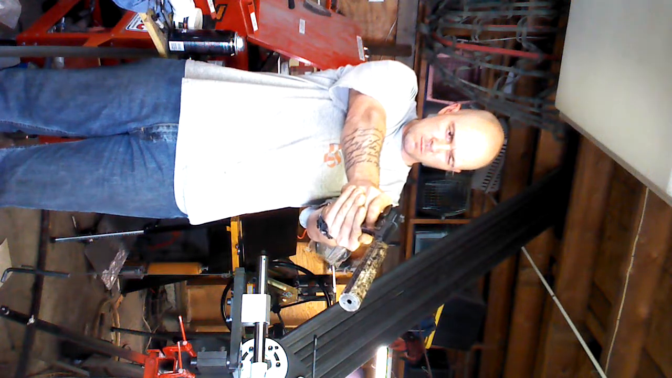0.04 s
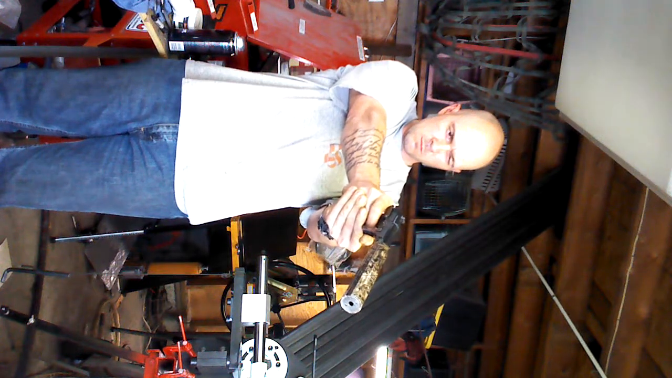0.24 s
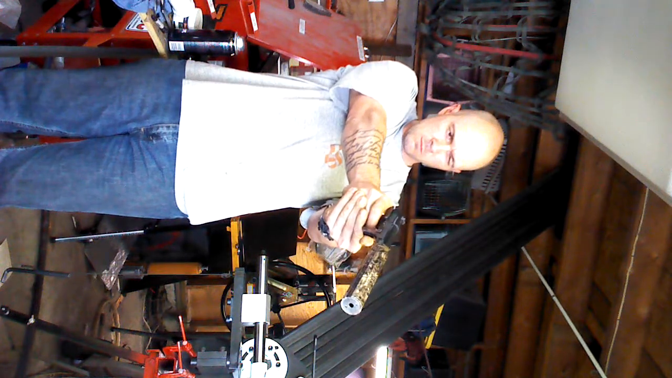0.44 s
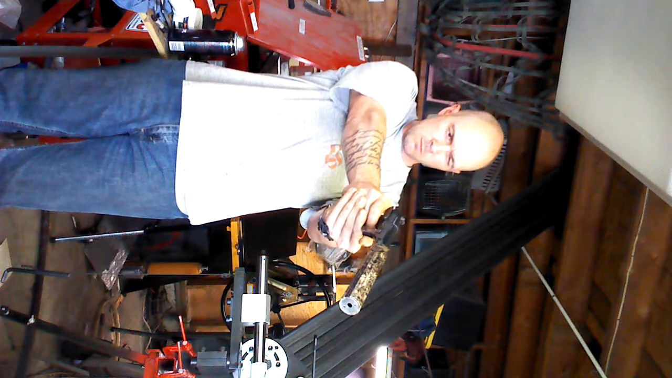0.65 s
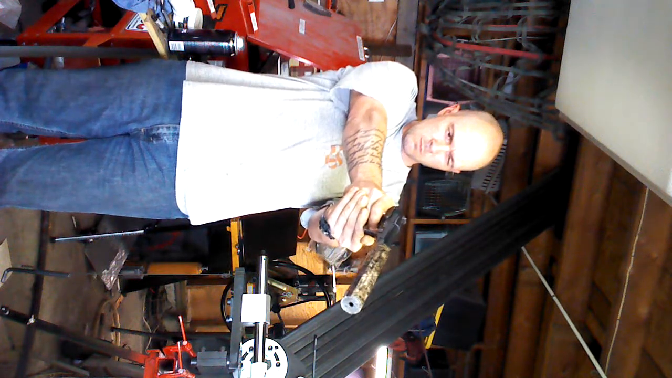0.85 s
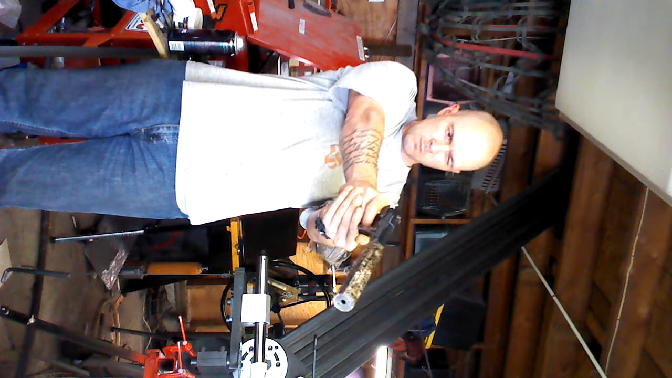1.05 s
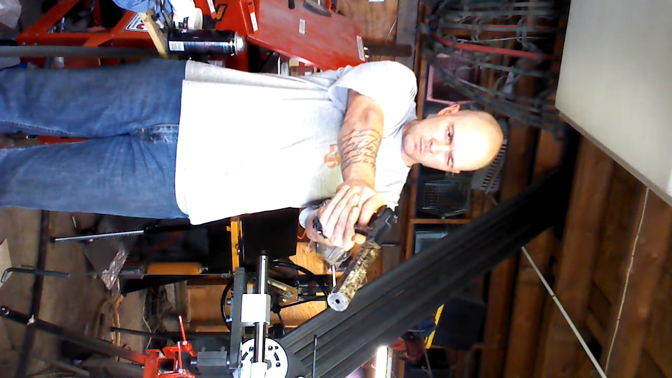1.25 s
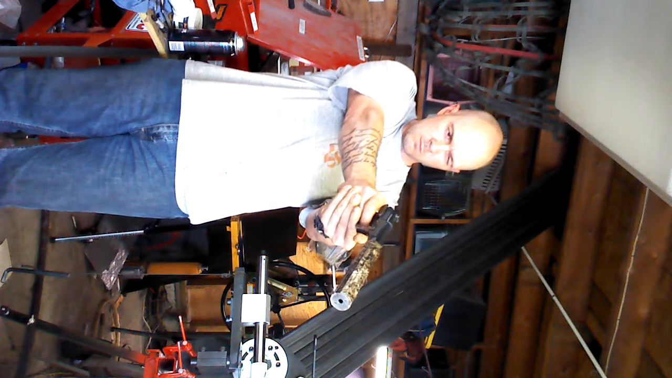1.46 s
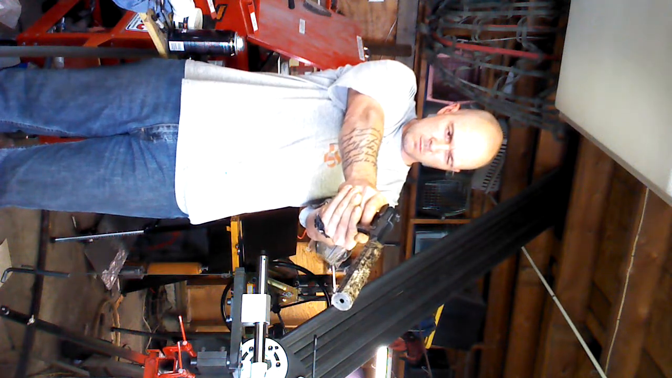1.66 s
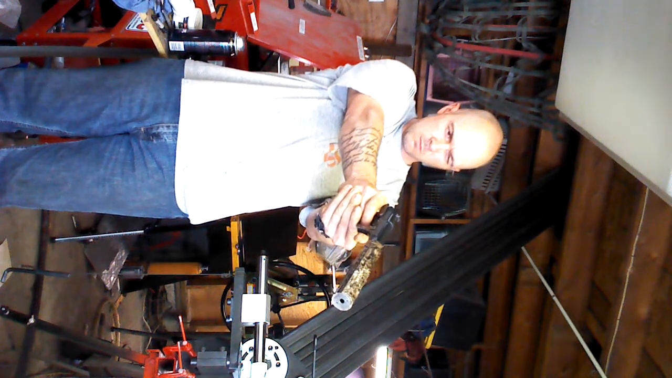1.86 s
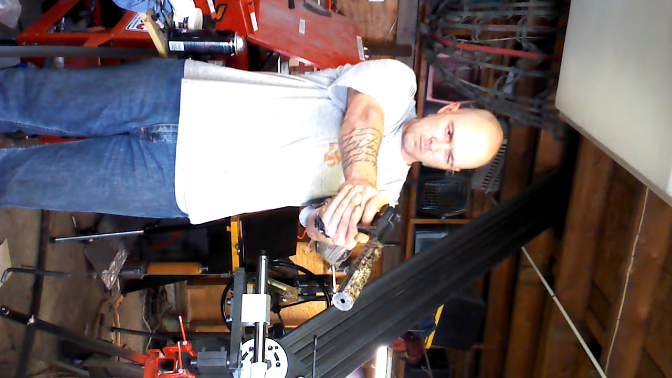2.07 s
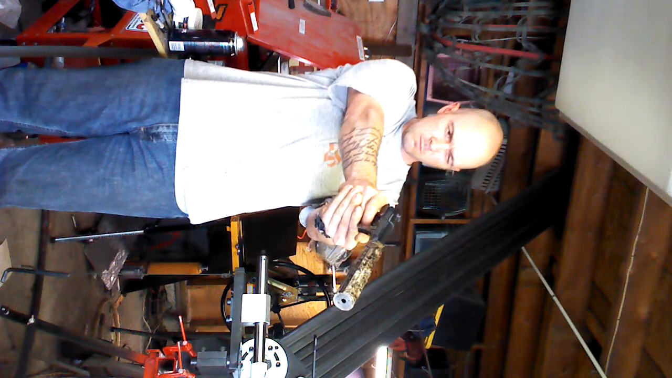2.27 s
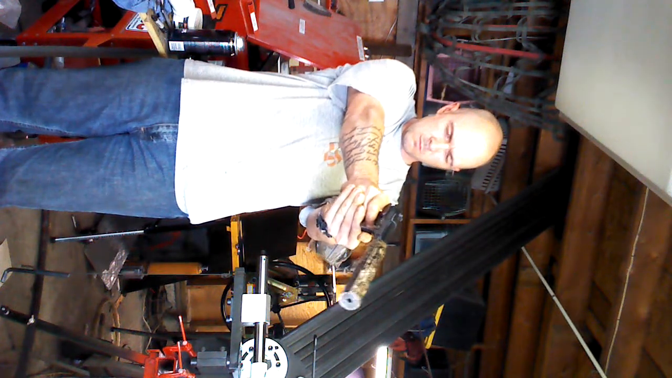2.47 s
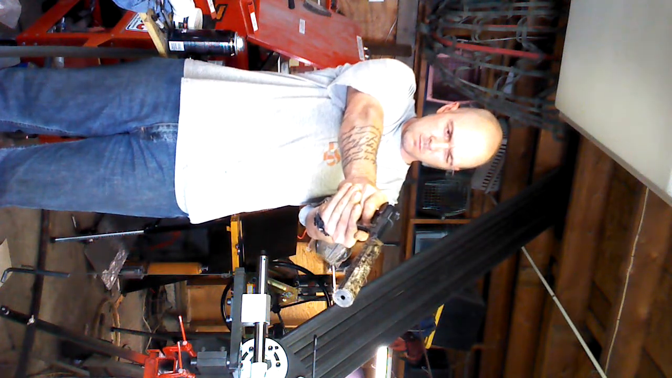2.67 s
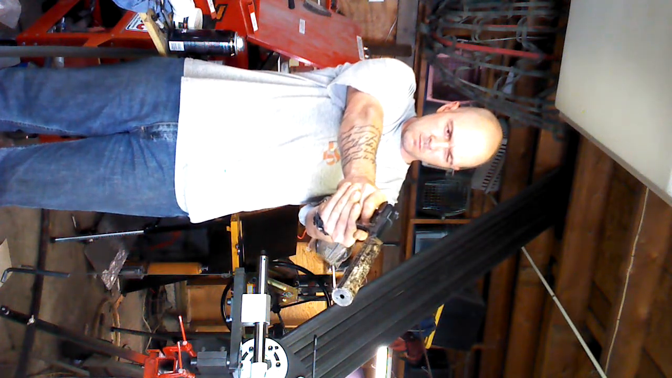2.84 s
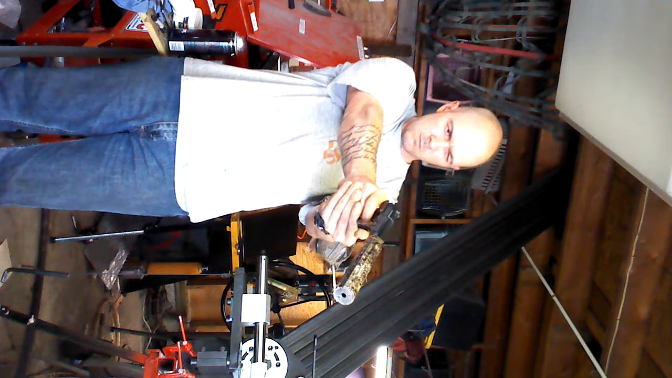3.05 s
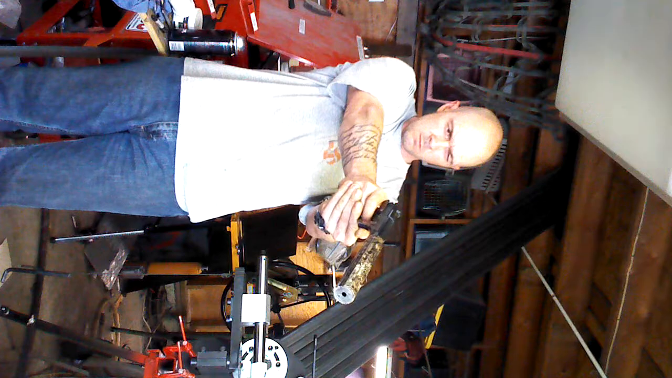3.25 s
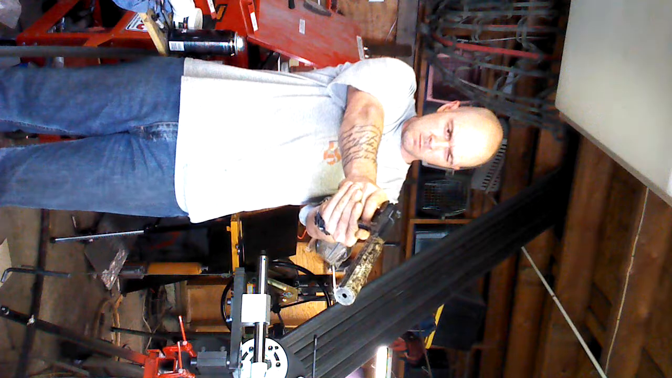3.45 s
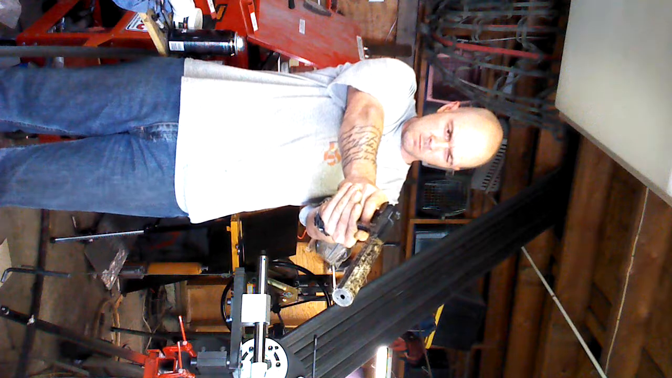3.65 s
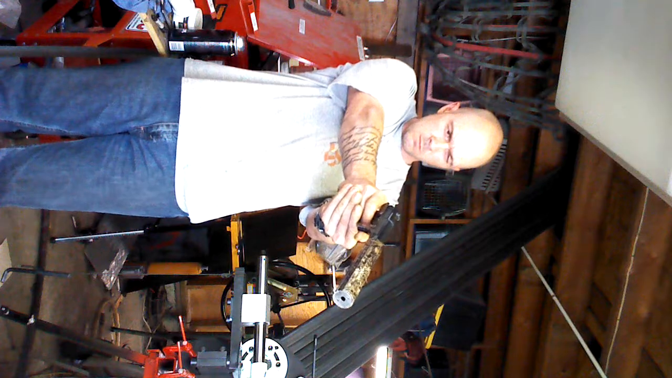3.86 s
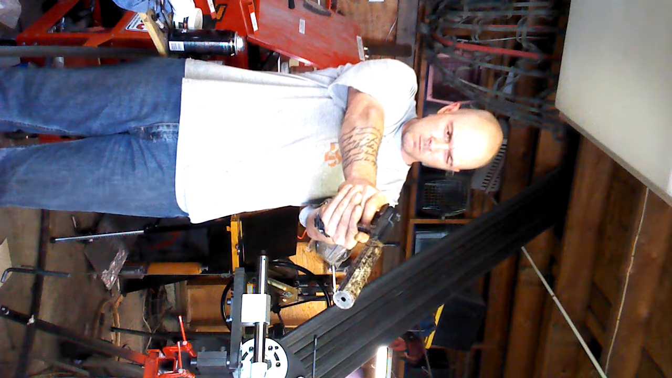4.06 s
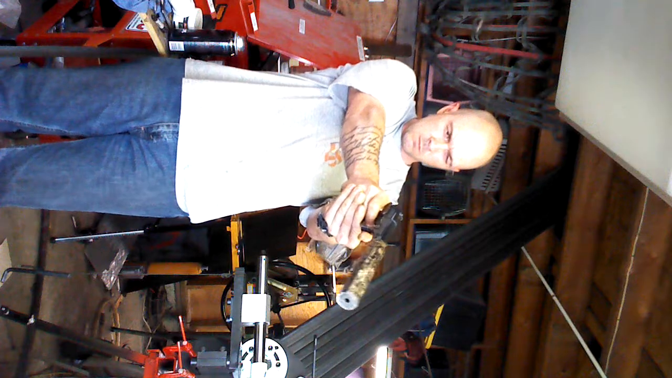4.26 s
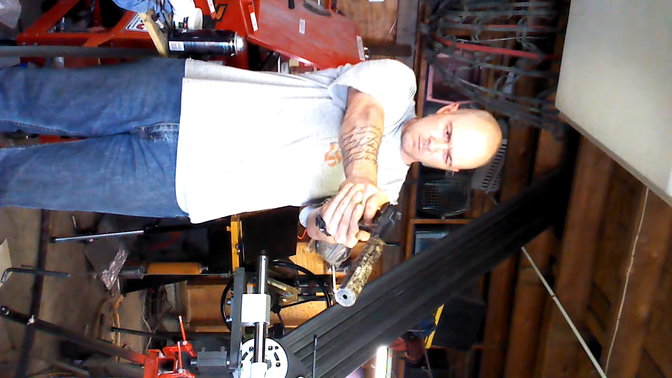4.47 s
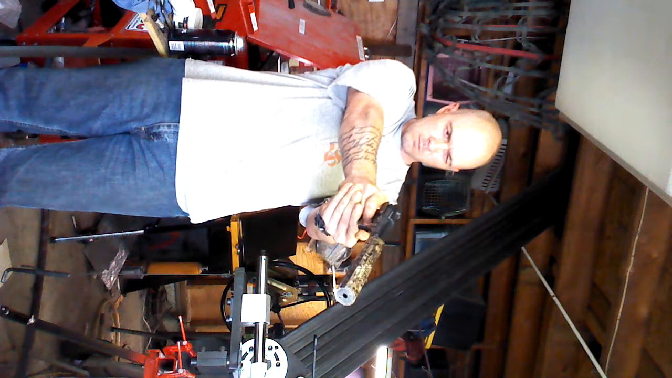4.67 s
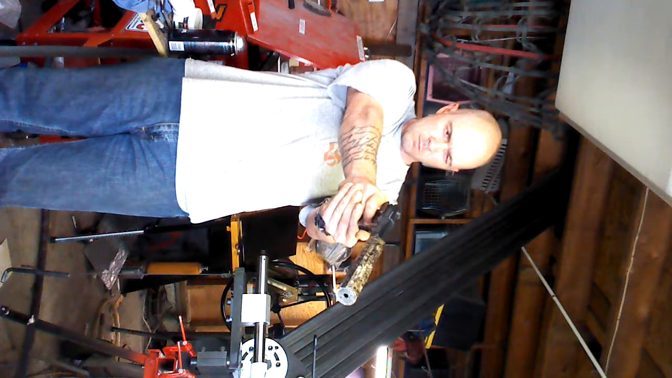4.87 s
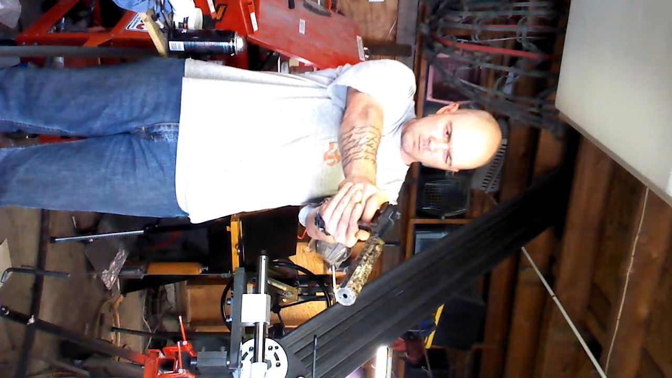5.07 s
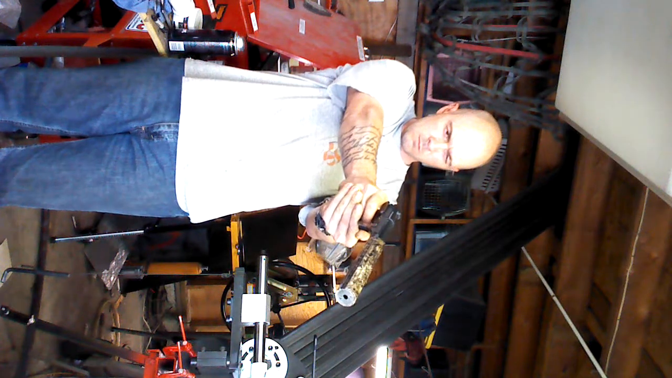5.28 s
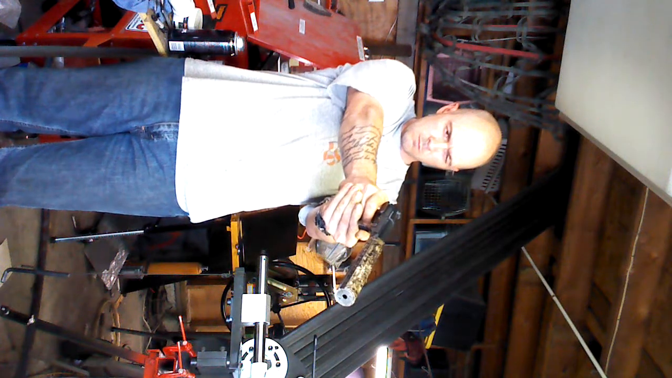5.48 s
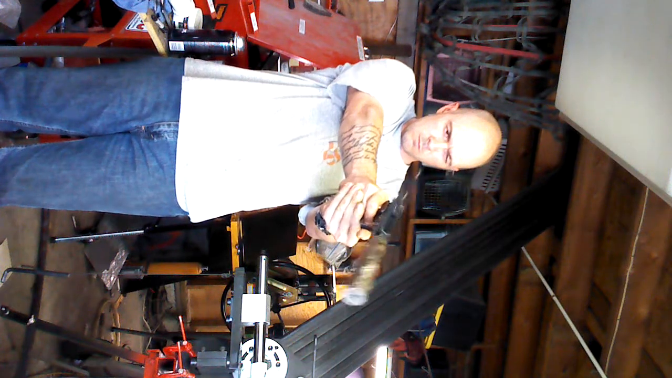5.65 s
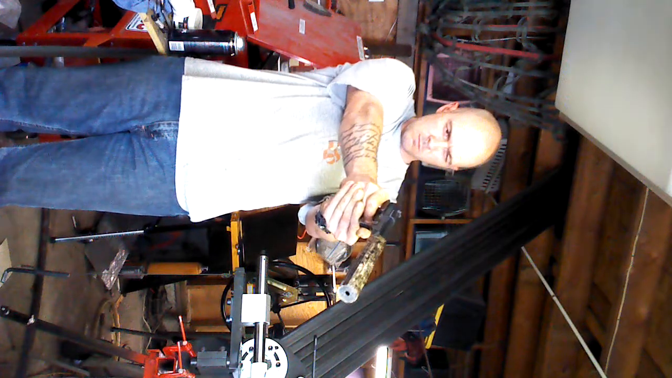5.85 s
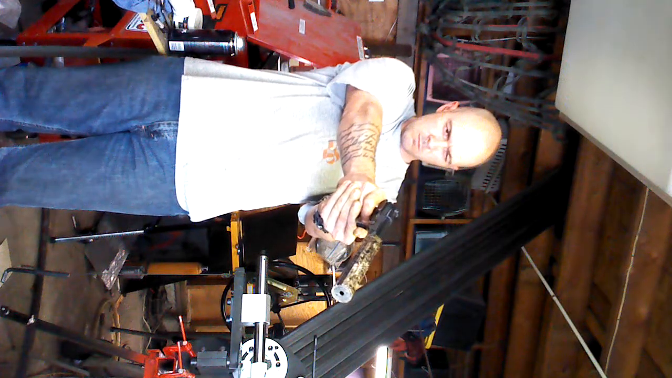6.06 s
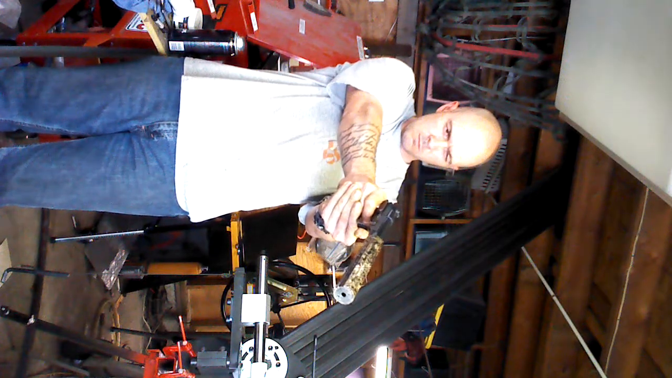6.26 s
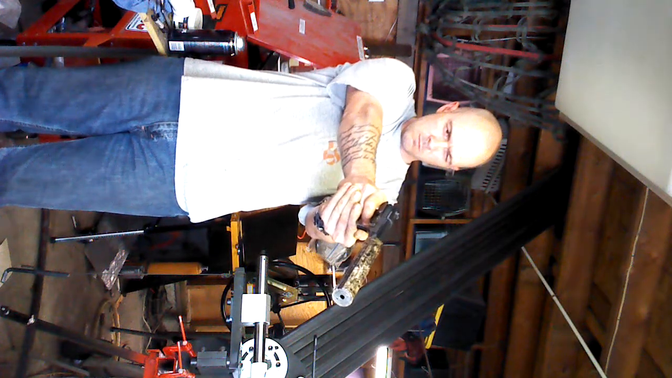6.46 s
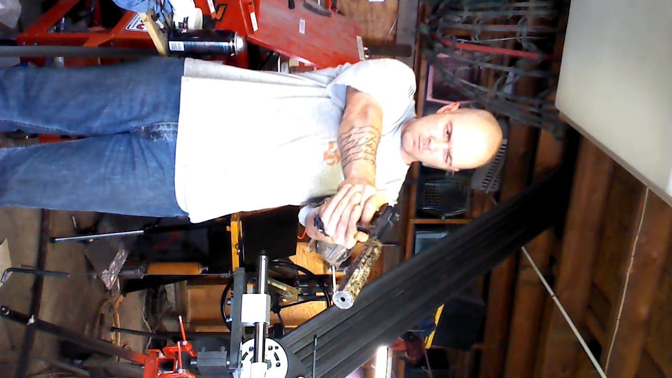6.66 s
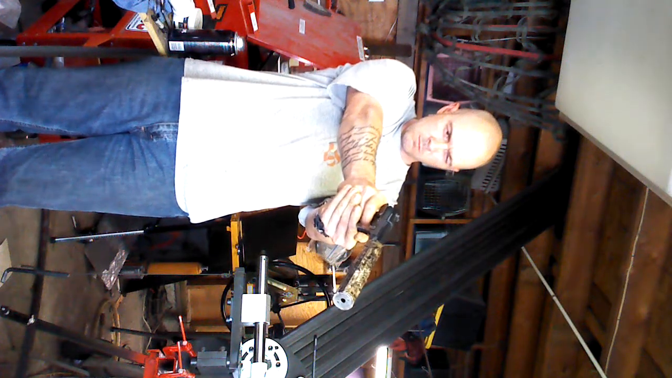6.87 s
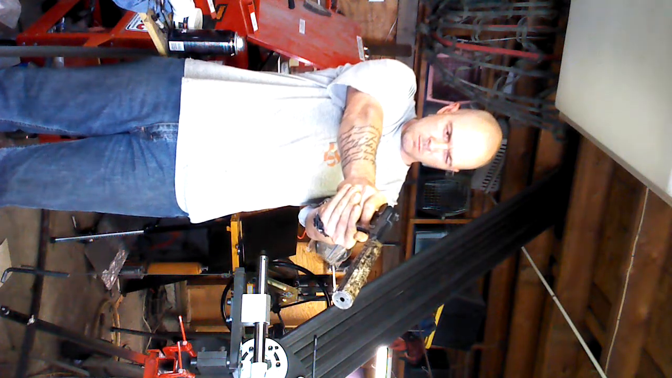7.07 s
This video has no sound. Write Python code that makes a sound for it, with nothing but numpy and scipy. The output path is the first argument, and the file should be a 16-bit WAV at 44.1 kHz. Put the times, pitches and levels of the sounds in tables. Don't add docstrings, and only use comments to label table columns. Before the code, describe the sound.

A heater fan hums low with a soft air rush in a small workshop, slightly subdued at first and rising, with faint ticks and a small double click before 0.2 s. At 0.73 s a suppressed pistol gives a hard, short gas pop, with a soft wooden thud and quick steel slide clacks within about 50 ms. The fan drops away, then creeps back. A case pings off something metallic at 1.3 and 1.5 s. The second shot, at 2.43 s, has the heaviest thud; faint case ticks and a trigger click follow around 3.0-3.2 s. The third, at 4.22 s, pops loudest, with knocks and thin ringing at 4.8-5.4 s. The fourth comes at 5.71 s, its case clinking brightly at 6.3-6.4 s, then a double click at 6.7 and a last tick at 7.1 s. Close stereo microphone, slightly overloaded, short room echo.

```python
import sys
import numpy as np
from scipy import signal
from scipy.fft import rfft, irfft, next_fast_len
from scipy.io import wavfile
from scipy.ndimage import uniform_filter1d

SR = 44100
rng = np.random.default_rng(int(sys.argv[2]) if len(sys.argv) > 2 else 0)


def volts_from_db(level):
    exponent = np.asarray(level, float) / 20
    return 10 ** exponent


def transcribe(u):
    v = np.clip(np.atleast_2d(u).T, -1, 1)
    q = np.round(v * 32767).astype(np.int16)
    wavfile.write(sys.argv[1], SR, q)


N = 313992


def along(points, hz):
    f, v = np.transpose(points)
    return np.interp(np.log(hz + 1), np.log(f + 1), v)


def filtered(x, response):
    m = next_fast_len(x.shape[-1] + 4096)
    spectrum = rfft(x, m) * response(np.fft.rfftfreq(m, 1 / SR))
    return irfft(spectrum, m)[..., :x.shape[-1]]


def causal(x, points):
    m = 2 * x.shape[-1]
    level = volts_from_db(along(points, np.fft.rfftfreq(m, 1 / SR)))
    cepstrum = irfft(np.log(level), m)
    cepstrum[1:m // 2] *= 2
    cepstrum[m // 2 + 1:] = 0
    return irfft(rfft(x, m) * np.exp(rfft(cepstrum)), m)[..., :m // 2]


def modes(table):
    def response(f):
        total = 0
        for k, (hz, width, db) in enumerate(table):
            damping = 1j * f * width
            total = total + (-1) ** k * volts_from_db(db) * damping / (hz * hz - f * f + damping)
        return total
    return response


def peak(x):
    return x / np.max(np.abs(x))


def burst(t60_s, scatter):
    common, own = rng.standard_normal(2048), rng.standard_normal((2, 2048))
    return (common + scatter * own) * volts_from_db(-60 * np.arange(2048) / SR / t60_s)


# frequency in Hz, likeness 0 to 1.
PORT_LIKENESS = [(100, .98), (250, .98), (480, .78), (700, .6), (950, .35), (1700, .05), (4000, 0)]
# frequency in Hz, level in dB.
PORT_SHADE = [(100, -1.6), (250, -2), (500, -2.5), (950, -4.5), (1700, -3), (2300, 0), (3800, -2)]


def ports(z, hz):
    turn = np.arccos(along(PORT_LIKENESS, hz))[:, None] / 2
    shade = volts_from_db(along(PORT_SHADE, hz) / 2)[:, None]
    same, apart = np.cos(turn) * z[0], np.sin(turn) * z[1]
    return np.array([(same + apart) * shade, (same - apart) / shade])


# frequency in Hz, t60 in seconds.
ROOM_T60 = [(150, 0.05), (500, .2), (1000, 0.34), (2500, 0.36), (6000, 0.32), (15000, 0.23)]


def add(out, start_s, x, room_db=None, rise_s=0.0021, feed=None):
    start = round(start_s * SR)
    out[:, start:][:, :x.shape[1]] += x
    if room_db is None:
        return
    hz, t, z = signal.stft(rng.standard_normal((2, SR // 5 * 2)), SR, nperseg=256)
    near_walls = 1 + 0.48 * volts_from_db(-60 * t / 0.16)
    decay = near_walls * volts_from_db(-60 * t / along(ROOM_T60, hz)[:, None])
    tail = signal.istft(ports(z, hz) * decay, SR, nperseg=256)[1]
    tail = tail * (1 - np.exp(-np.arange(tail.shape[1]) / SR / rise_s))
    if feed is None:
        feed = x[0]
    else:
        feed = feed * np.linalg.norm(x[0]) / np.linalg.norm(feed)
    wet = volts_from_db(room_db) * signal.fftconvolve(feed[None], tail / np.linalg.norm(tail[0]), axes=1)
    out[:, start:][:, :wet.shape[1]] += wet


# level in dB, climb in dB per second.
GAIN_START = (-10, 9.17)
DUCKS_DB = [-15.5, -17.5, -16.5, -16]


def gain_db():
    climb_db_per_s = 8.5
    t = np.arange(N) / SR
    level = GAIN_START[0] + GAIN_START[1] * t
    for (shot_s, *_), duck_db in zip(SHOTS, DUCKS_DB):
        caught = np.clip((t - shot_s) / .03, 0, 1)
        level = level + caught * (duck_db + climb_db_per_s * (t - shot_s) - level)
    return np.minimum(level, 3)


# frequency in Hz, level in dB per Hz.
FAN_AIR = [(30, -14.5), (60, -19), (100, -3), (220, -9.5), (320, -5), (450, -11.5), (600, -11),
           (1000, -17.5), (1400, -14), (2200, -28.5), (3400, -32), (6200, -45.5), (9000, -64),
           (15000, -74.5)]
# centre in Hz, width in Hz, level in dB.
FAN_HUM = [(212, 19, 14), (261, 21, 5.5), (310, 82, 2), (366, 23, 7), (456, 26, 13), (540, 22, 6),
           (650, 2, 9.5)]


def fan():
    bands, _, z = signal.stft(rng.standard_normal((2, N)), SR, nperseg=512)
    patches = uniform_filter1d(rng.standard_normal(z.shape[1:]), 5, 0)
    patches = uniform_filter1d(patches, 12, 1)
    patchy = ports(z, bands) * volts_from_db(0.4 * patches / patches.std())
    pair = signal.istft(patchy, nperseg=512)[1][:, :N]

    def colour(hz):
        hum_db = sum(db / (1 + ((hz - centre) / width) ** 2) for centre, width, db in FAN_HUM)
        return volts_from_db(along(FAN_AIR, hz) + hum_db)

    air = filtered(pair, colour)
    return volts_from_db(-41.5 + gain_db()) * air / air.std()


# frequency in Hz, level in dB.
MOTOR_TONES = [(212, -58), (317.6, -42.5)]


def motor():
    t = np.arange(N) / SR
    drift = np.cumsum(rng.standard_normal((len(MOTOR_TONES), N)), axis=1) * .006
    tones = sum(volts_from_db(db) * np.sin(2 * np.pi * hz * t + d) for (hz, db), d in zip(MOTOR_TONES, drift))
    return np.outer([.75, 1], volts_from_db(gain_db()) * tones)


# frequency in Hz, level in dB per Hz.
PREAMP_HISS = [(3000, -3.5), (8000, -2), (12000, -4.5), (15300, -4), (15500, -59)]


def hiss():
    noise = filtered(rng.standard_normal((2, N)), lambda hz: volts_from_db(along(PREAMP_HISS, hz)))
    return volts_from_db(-79 + 0.57 * gain_db()) * noise / noise.std()


def tick(out, start_s, peak_db, dull_db, edge_db, sparkle_db, room_db):
    colour = [(400, dull_db - 13.0), (900, dull_db), (1700, dull_db + 4), (4500, 0.004),
              (8000, edge_db + 12.5), (14500, sparkle_db + 7)]
    contact = burst(0.031, scatter=0.9)
    contact[:, :2] = 5
    heard = volts_from_db(peak_db + 1.5) * peak(causal(contact, colour))
    add(out, start_s, heard, room_db, rise_s=0.0022, feed=causal(signal.unit_impulse(2048), colour))


def ring(out, start_s, ring_hz, db, t60_s, wander):
    t = np.arange(SR // 3) / SR
    tumble = np.cumsum(rng.standard_normal((2, len(t))), axis=1) * wander
    envelope = volts_from_db(db - 60 * t / t60_s) * (1 - np.exp(-t / 0.0012))
    add(out, start_s, envelope * np.sin(2 * np.pi * ring_hz * t + tumble))


# start in seconds, peak in dB, dullness in dB, brightness in dB, brass ring in dB.
BOUNCES = [(0.0781, -41.5, 6, -43, -100), (0.2396, -51.5, 2, -35, -100), (.6848, -40.5, 16, -28, -100),
           (1.3115, -38.5, 3, -27.5, -73), (1.336, -39.5, -14, -23, -72), (1.474, -39, -12, -21.5, -77),
           (1.5992, -60, -4, -20.5, -64.5), (1.6549, -47.5, 6, -39, -90), (1.7511, -50.5, 2.5, -31, -90),
           (3.0078, -47.5, -5.5, -12, -84), (3.057, -46, -4, -23.5, -90), (3.1516, -50.5, 16, -17, -90),
           (4.8344, -34.5, 4.5, -31, -91), (4.991, -43.5, 3, -28, -63), (5.0672, -40, -1, -24, -83),
           (5.2747, -52.5, -7, -12, -67.5), (5.3992, -63, 11.5, -18, -81), (5.59, -70, 5.5, -17, -77.5),
           (6.3006, -41.5, 4.5, -30, -83.5), (6.3082, -35, 2, -24, -58), (6.4216, -32.5, 1, -25, -86),
           (6.655, -58.5, -0.5, -21, -76), (7.1003, -35, 3.5, -17.5, -97)]
BRASS_HZ = [12500, 12520, 12500, 12380, 12800]
LANDING_ROOM_DB = [1.6, 7.5, 5.3, 3, 2.1]


def cases(out):
    for start_s, peak_db, dull_db, bright_db, brass_db in BOUNCES:
        fired = sum(start_s > shot[0] for shot in SHOTS)
        tick(out, start_s, peak_db, dull_db, bright_db, bright_db - 1.5, LANDING_ROOM_DB[fired])
        ring(out, start_s, BRASS_HZ[fired], brass_db, t60_s=.22, wander=.1)


# start in seconds, peak in dB.
TRIGGER_TICKS = [
    (0.1388, -45.5),
    (1.0451, -50),
    (3.1802, -41),
    (5.102, -44.5),
    (5.4837, -62),
    (6.7201, -41.5),
]
# dullness, edge, sparkle and room, all in dB.
TRIGGER_COLOUR = (-3.5, -16.5, -9, 5.5)


def trigger(out):
    for start_s, peak_db in TRIGGER_TICKS:
        tick(out, start_s, peak_db + 0.5, *TRIGGER_COLOUR)
        tick(out, start_s + .019, peak_db - 2, *TRIGGER_COLOUR)


# start in seconds, pop in dB, low push in dB, bullet thud in dB,
# slide rebound after its stop in seconds.
SHOTS = [
    (0.7302, 1.5, -14, -30, .008),
    (2.4304, 0, -8.5, -13, 0.0083),
    (4.2192, 2, -9, -18.5, .009),
    (5.7058, 1.5, -13.5, -28.5, 0.0035),
]
# centre in Hz, width in Hz, level in dB.
CAN_MODES = [(656.4, 420, -2), (1200, 230, -3.5), (3520, 1800, -0.5), (6270, 2300, -2), (9350, 3200, -6),
             (14000, 3000, -9)]
# frequency in Hz, level in dB.
SLIDE_SCRAPE = [(1500, -21.5), (3500, -7), (6500, -7.5), (9500, -2.5), (12500, -4), (16000, -11.5)]
BLAST_S = (.00008, .00016)


def pistol(out):
    snap_hz, snap_t60_s, snap_share = 3900, .005, .75
    t = np.arange(2048) / SR
    can = modes(CAN_MODES)
    for shot_s, pop_db, push_db, *_ in SHOTS:
        hammer = peak(filtered(burst(.1, scatter=0.66), can))
        hammer = hammer * (t < .0027) * (0.17 + t / 0.0042)
        add(out, shot_s - .0027, volts_from_db(-14) * hammer)

        gas = peak(filtered(burst(.007, scatter=1.1), can))
        u = t / np.array(BLAST_S)[:, None]
        front = -np.e * u * (1 - u / 3) * np.exp(-u)
        front = front - snap_share * np.sin(2 * np.pi * snap_hz * t) * volts_from_db(-60 * t / snap_t60_s)
        can_tap = filtered(1. * (t == 0), can)
        add(out, shot_s, volts_from_db(pop_db - 3.0) * (front + 0.72 * gas), room_db=-2.0, rise_s=.008, feed=can_tap)

        push = np.sin(2 * np.pi * 420 * t) * volts_from_db(-60 * t / 0.0045)
        add(out, shot_s + 0.0003, volts_from_db(push_db + 4.5) * np.outer([.15, 1], push))

        stroke = np.clip(t / 0.04, .35, 1) * volts_from_db(-60 * np.clip(t - .018, 0, 1) / 0.0035)
        scrape = peak(causal(burst(15, scatter=9.9), SLIDE_SCRAPE))
        add(out, shot_s + 0.0018, volts_from_db(-12.5) * stroke * scrape, room_db=4.5)


# clack in dB, slide ring in dB, block thud relative to the bullet's in dB.
SLIDE_CYCLE = [
    (-14, -9.5, 4),
    (-13.5, -20, -18),
    (-17.5, -17.5, -30),
    (-18, -24.5, -53),
]
# frequency in Hz, level in dB.
CLACK_COLOUR = [(200, -31), (800, -14.5), (1500, 3.5), (2500, -8), (4000, 0), (5500, -13), (9000, -10.5),
                (16000, -27)]
# centre in Hz, width in Hz, level in dB.
SLIDE_MODES = [(1420, 190, -9.5), (2250, 140, -0.5), (2900, 310, -10), (3460, 220, -1)]
# centre in Hz, width in Hz, level in dB.
WOOD_MODES = [(330, 780, -2), (694, 730, -7), (1450, 97, -8)]


def blows(out):
    stop_s, rattle_s, close_s = .017, .0065, 0.052
    t = np.arange(2048) / SR
    tap = signal.unit_impulse(2048)
    soft_blow = -np.exp(-((t - .0008) / 0.001) ** 2)
    thud = peak(filtered(soft_blow, modes(WOOD_MODES)))

    def steel(x, clack_db, ring_db):
        clack = volts_from_db(clack_db) * peak(causal(x, CLACK_COLOUR))
        return clack + volts_from_db(ring_db) * peak(filtered(x, modes(SLIDE_MODES)))

    for shot_s, _, _, bullet_db, rebound_s in SHOTS:
        delays_s = [stop_s, stop_s + rebound_s, stop_s + rebound_s + rattle_s, close_s]
        for delay_s, (clack_db, ring_db, under_db) in zip(delays_s, SLIDE_CYCLE):
            clatter = steel(burst(0.024, scatter=0.69), clack_db, ring_db)
            walls_hear = steel(tap, clack_db, ring_db)
            add(out, shot_s + delay_s, clatter, room_db=0.23, rise_s=0.0028, feed=walls_hear)
            block = volts_from_db(bullet_db + under_db + 3) * np.outer([1, .15], thud)
            add(out, shot_s + delay_s, block, room_db=-6)


# start in seconds, pitch in Hz, level in dB, t60 in seconds.
STRUCK_THINGS = [(1.312, 4140, -47.5, .15), (1.312, 4414, -54, 0.23), (1.312, 1950, -65, .22),
                 (1.312, 6858, -64, .3), (1.474, 2000, -52.5, 0.41), (1.474, 4450, -49.5, 0.16),
                 (1.474, 6900, -67, .18), (3.18, 1730, -54, 0.091), (4.835, 1043, -46.5, 0.093),
                 (4.835, 1310, -45, 0.079), (5.067, 2340, -52, 0.072), (6.309, 1327, -43.5, 0.08),
                 (6.308, 1600, -41, 0.059), (6.309, 2150, -39, 0.049)]


def struck(out):
    for start_s, ring_hz, db, t60_s in STRUCK_THINGS:
        ring(out, start_s, ring_hz, db, t60_s, wander=.07)


def scene():
    out = np.zeros((2, N + SR))
    for source in (pistol, blows, trigger, cases, struck):
        source(out)
    return out[:, :N] + fan() + motor() + hiss()


def band_limit(x):
    return signal.sosfilt(signal.butter(12, 16440, fs=SR, output="sos"), x)


def record(dry):
    steer_samples, low_hz, top_hz = 16, 45, 15800
    other = np.pad(dry[::-1], ((0, 0), (steer_samples, 0)))[:, :N]
    steered = dry - other
    clipped = steered / (1 + np.abs(steered / .95) ** 8) ** (1 / 8)

    def band(hz):
        return (1j * hz / (low_hz + 1j * hz)) ** 2 / (1 + (hz / top_hz) ** 70)

    mix = np.clip(filtered(clipped, band), -1, 1)
    return band_limit(mix)


dry = scene()
out = record(dry)
transcribe(out)
```